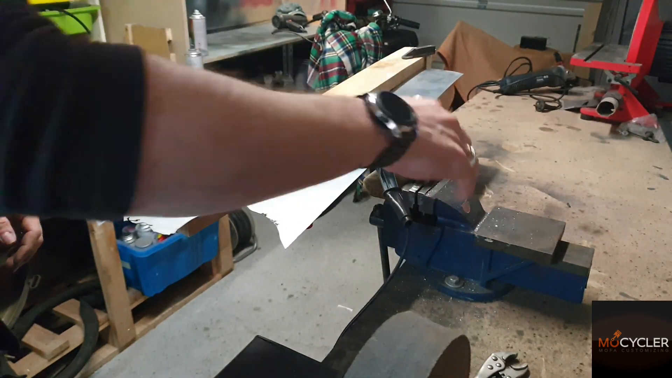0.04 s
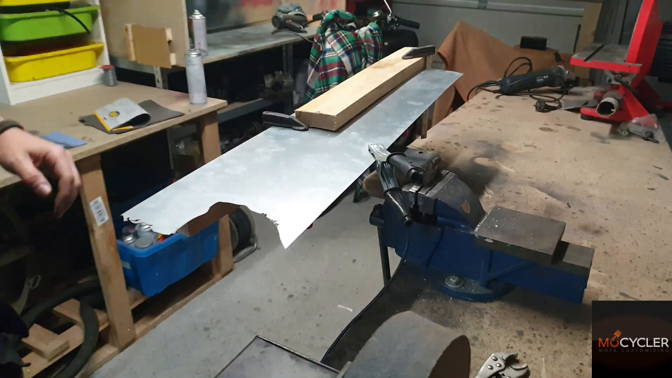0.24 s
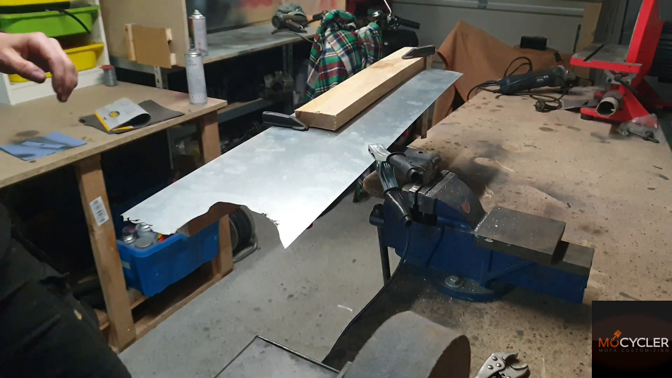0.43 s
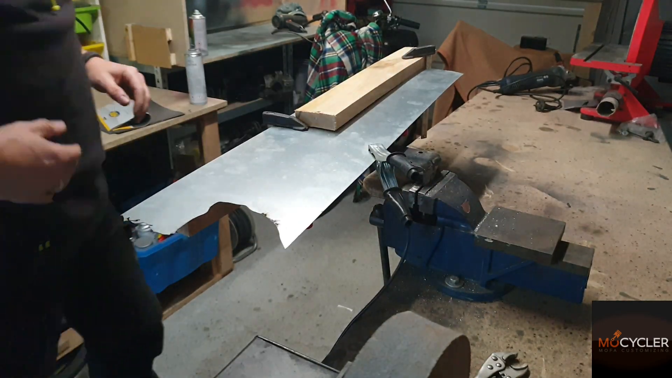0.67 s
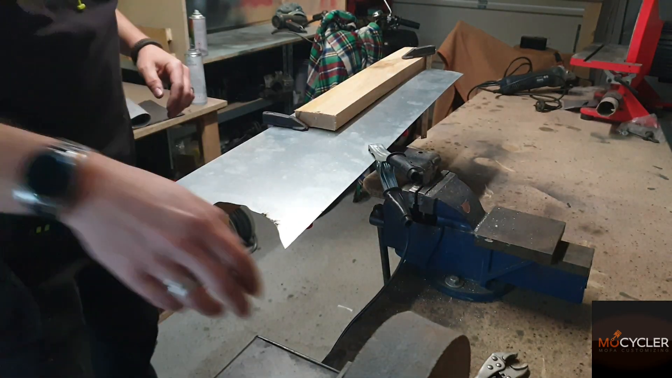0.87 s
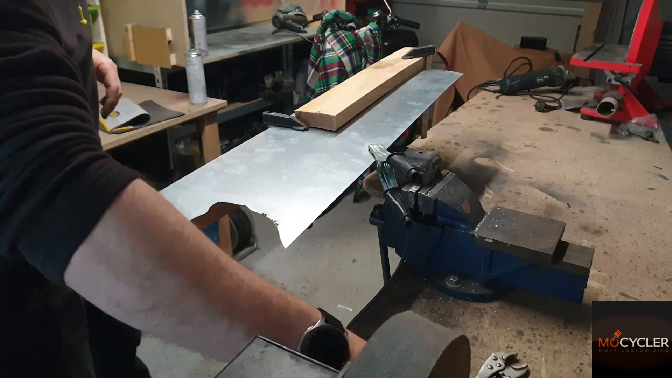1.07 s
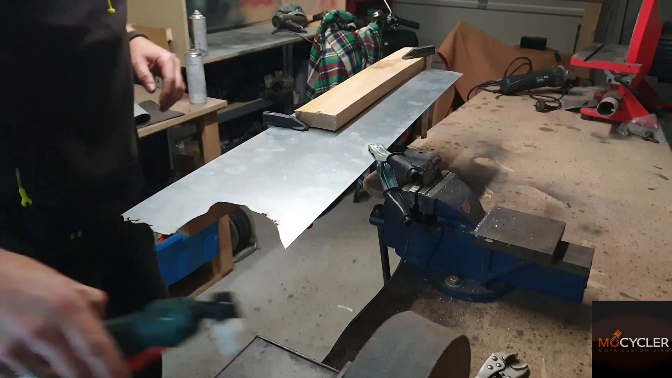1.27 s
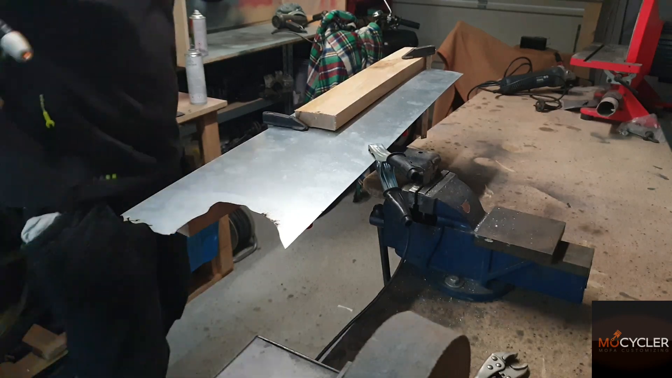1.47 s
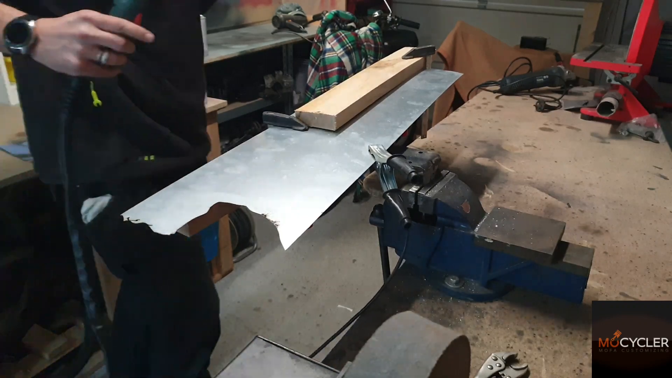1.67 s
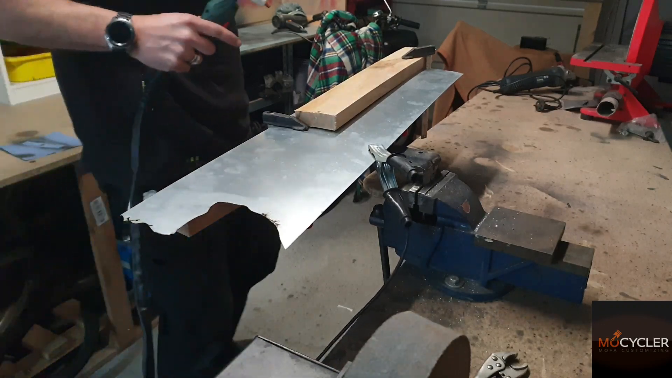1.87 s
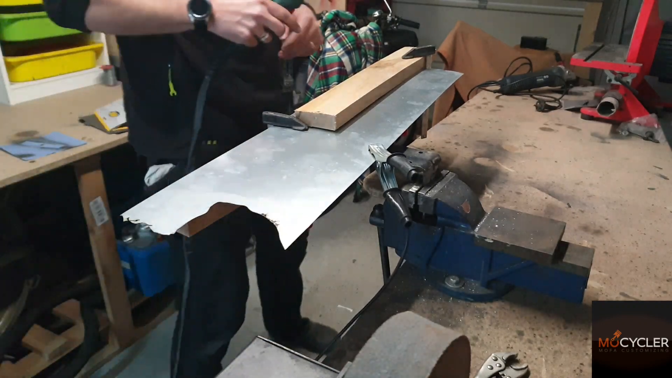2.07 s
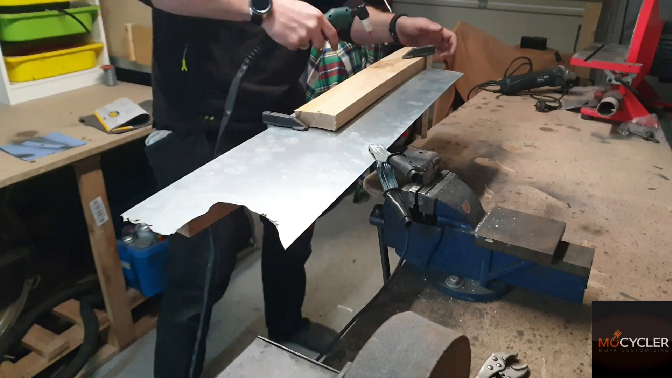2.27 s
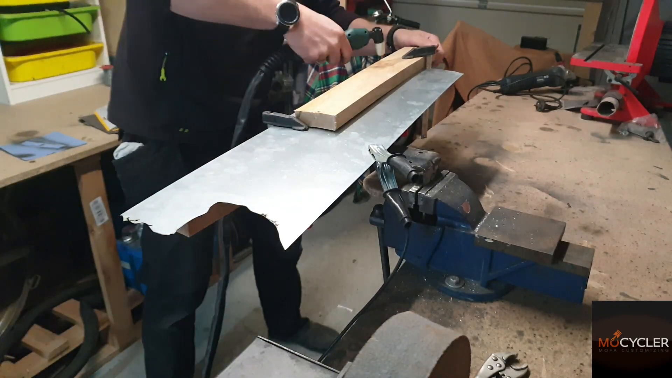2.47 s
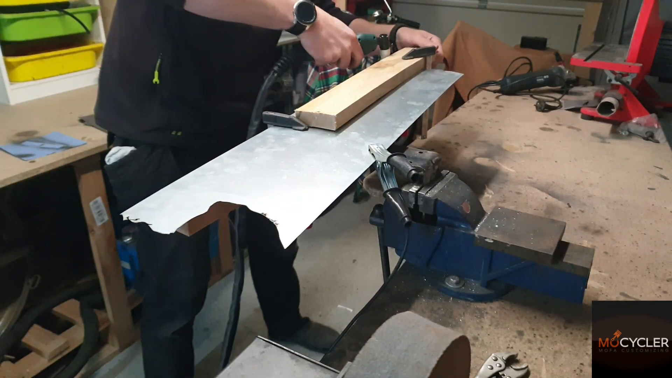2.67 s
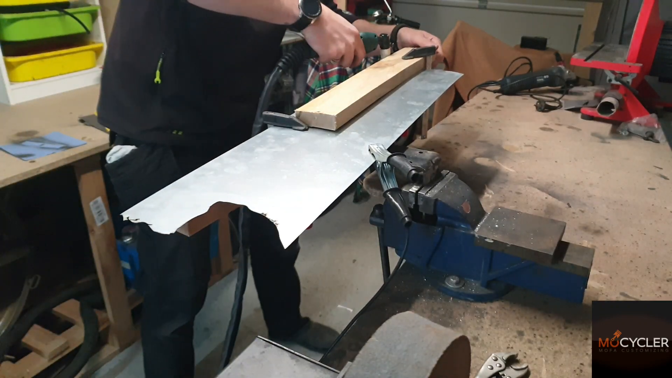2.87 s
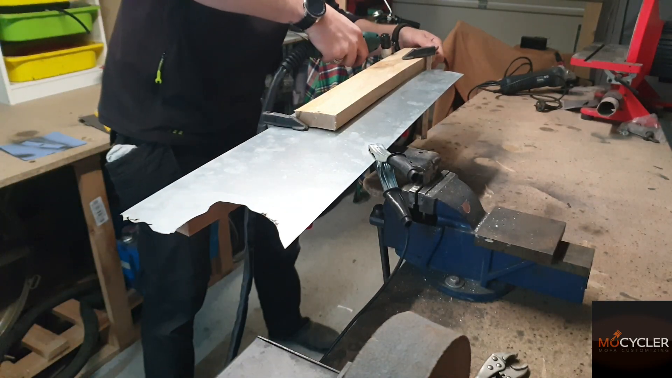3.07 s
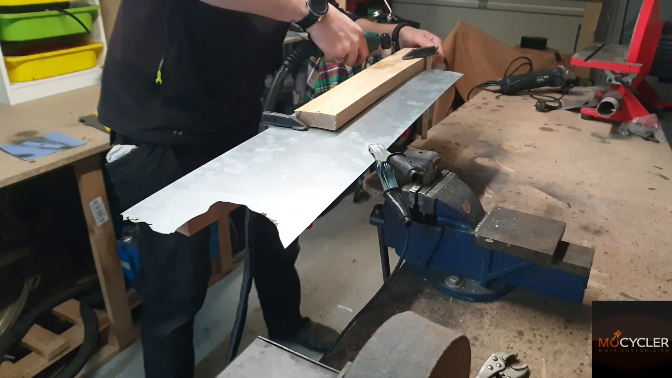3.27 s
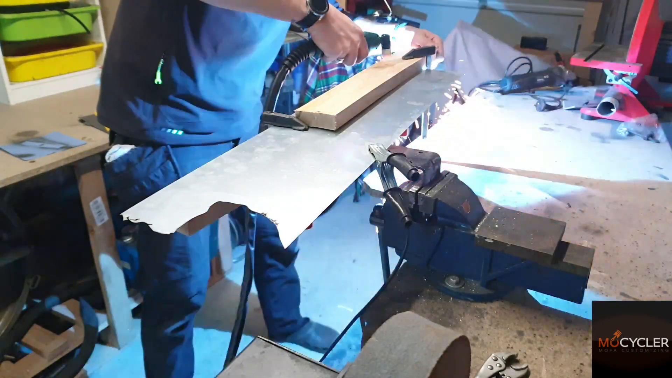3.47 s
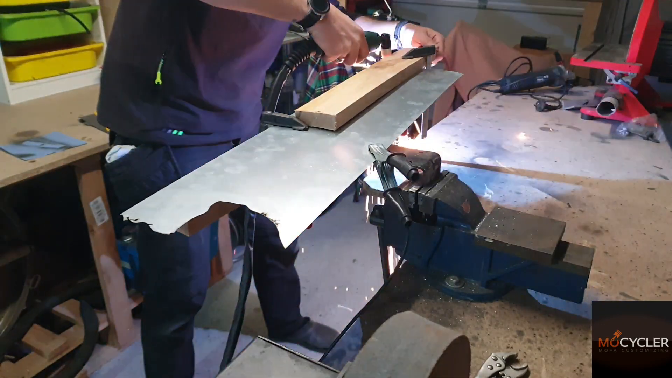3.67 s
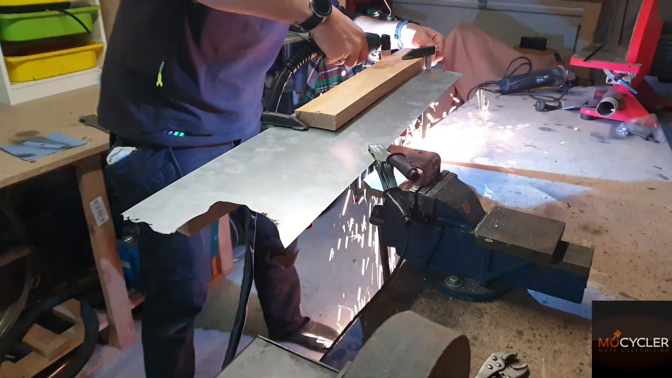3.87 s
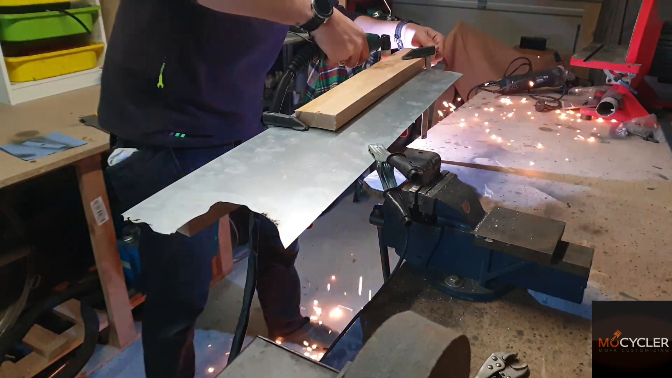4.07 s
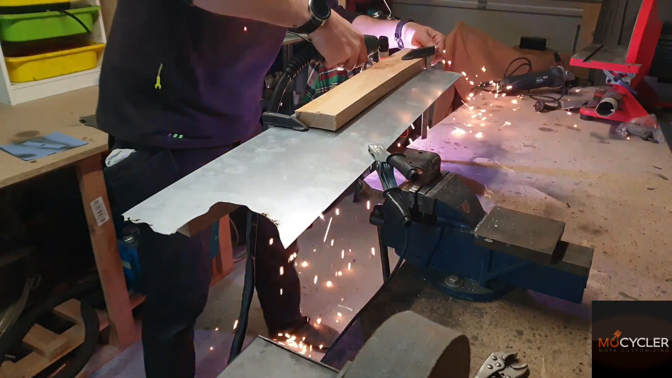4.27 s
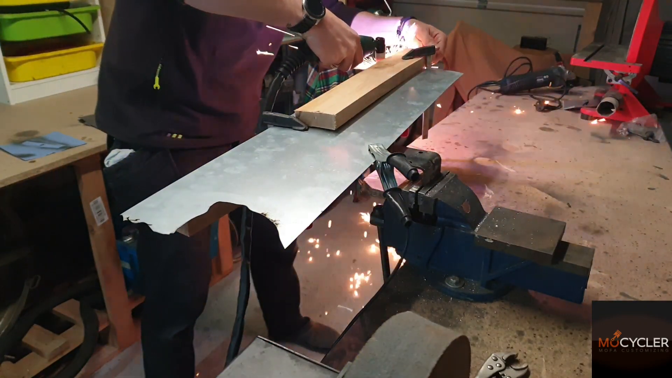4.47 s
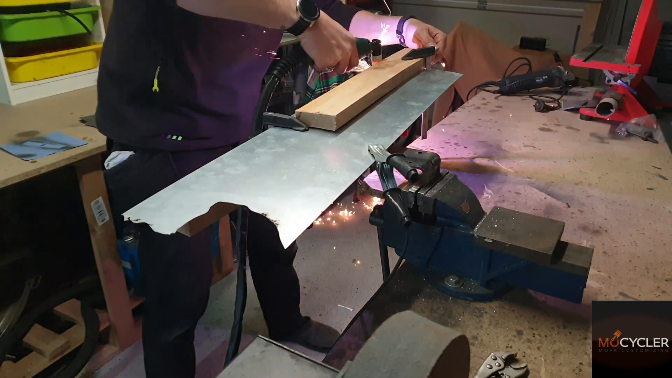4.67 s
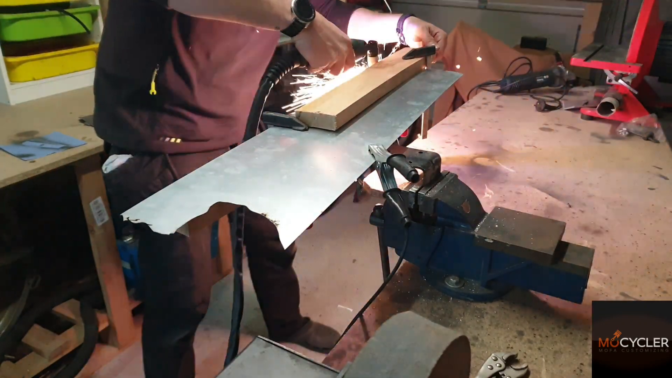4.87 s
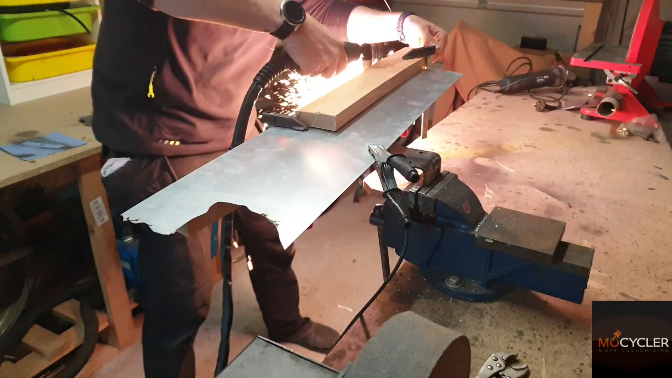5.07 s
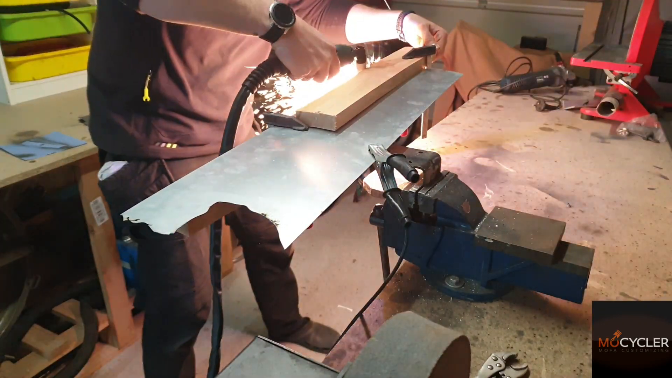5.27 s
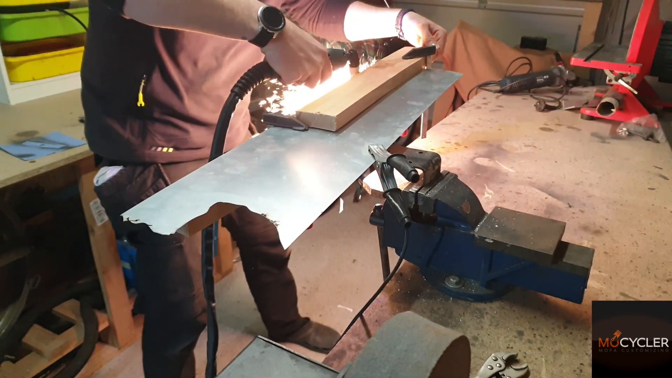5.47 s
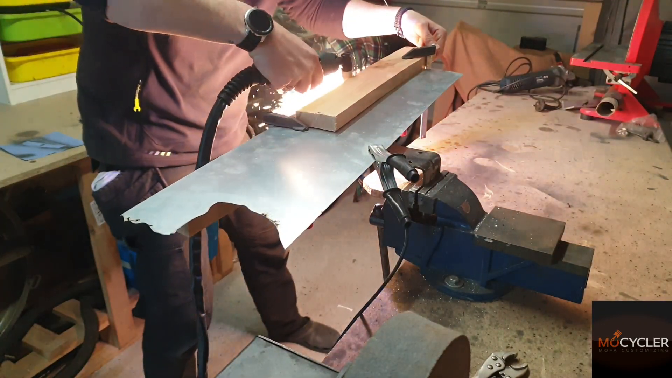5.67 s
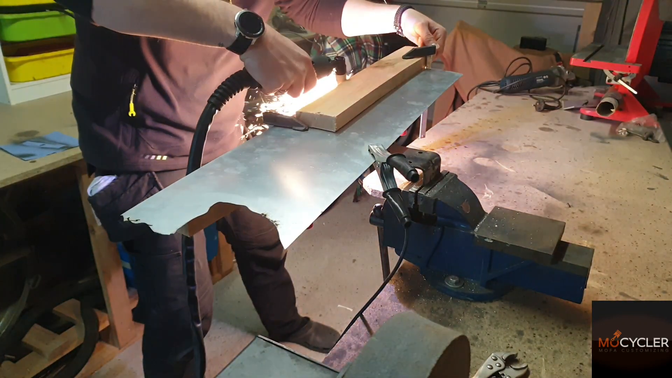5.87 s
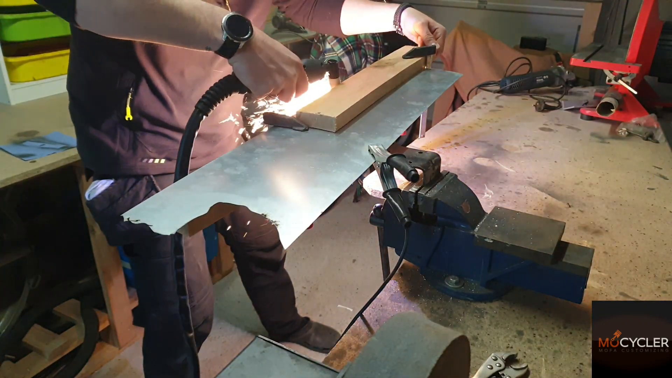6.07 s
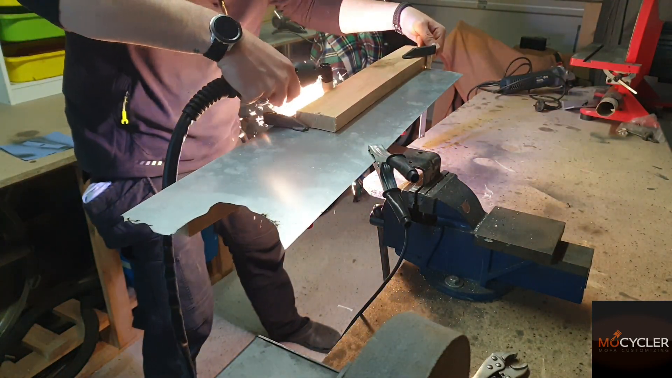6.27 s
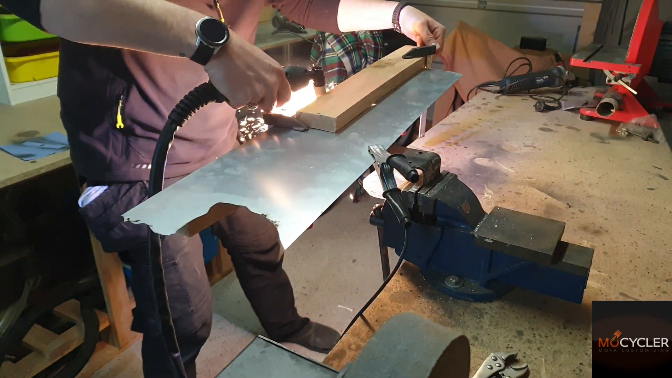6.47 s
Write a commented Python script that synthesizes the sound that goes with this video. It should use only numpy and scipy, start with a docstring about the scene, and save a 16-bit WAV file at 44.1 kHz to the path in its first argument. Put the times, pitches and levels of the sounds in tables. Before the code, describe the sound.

A small workshop with short reverberation, heard by a fixed stereo microphone. From 0 s an idle machine gives a faint midrange whine, low wavering drone and soft air, leaning left. Tiny, scratchy falling chirps come from far off in the first half second and again from 2 to 3.3 s. A slight knock at 0.1 s; at 0.95 to 1.15 s a torch is knocked and scraped off the bench, the clearest handling sound. Dull footfalls follow around 1.0 to 1.7 s, with a small click near 1.8 s and cloth and hose swishes until 2.3 s. At 3.43 s the plasma arc strikes abruptly, very loud against the quiet: low puffs, uneven flares, hollow roar with a blurred whistle. At 4.2 s it enters the sheet; roar and hollowness drop away, leaving a bright, wide, finely crackling hiss, swelling slightly to 5.4 s and continuing steadily to the cutoff at 6.5 s.

```python
"""A plasma cutter in a small workshop: the arc strikes at a steel sheet's edge with a hollow, sputtering
roar, then settles into an even hiss along the cut. Before it, the idle machine hums while someone picks up
the torch and steps to the bench, with faint high chirps in the distance. The jet is shaped turbulent noise
with resonances; knocks and steps are decaying modes; hum and chirps are sines of wavering pitch.
"""
import sys
import numpy as np
from scipy import signal
from scipy.fft import rfft, irfft
from scipy.io import wavfile

SR = 44100
rng = np.random.default_rng(int(sys.argv[2]) if len(sys.argv) > 2 else 0)


def dump(signal):
    """Clip the signal to [-1, 1] and save it as 16-bit WAV at the path in sys.argv[1]."""
    limited = np.clip(np.atleast_2d(signal).T, -1, 1)
    pcm = np.round(limited * 32767).astype(np.int16)
    wavfile.write(sys.argv[1], SR, pcm)


N = 287532
TIME, BINS = np.arange(N) / SR, np.fft.rfftfreq(N, 1 / SR)  # s, Hz
STRIKE_S, ENTER_S = 3.433, 4.21  # the arc lights; the torch leaves the edge and enters the sheet


def torch(flutter_db=0.6, edge_unrest_db=0.3, cut_unrest_db=0.5):
    """Amplitude envelope on jet noise: it starts abruptly with extra level, which decays exponentially."""
    # Level of the air jet as the torch moves. Each row: time in seconds, level in dB without the extra.
    jet_levels = [(4.0, -43.5), (4.28, -39.5), (4.76, -40), (4.97, -37.5), (5.4, -36), (6.5, -37.5)]
    # Low puffs while the arc bites. Each row: centre in seconds, level in dB, width in seconds.
    puff_times = [(3.46, -47.5, 0.06), (3.575, -49.5, 0.086), (3.833, -46.5, 0.038), (4.18, -57, .05)]
    # Spectrum of a puff. Each row: frequency in Hz, relative density in dB per Hz.
    puff_spectrum = [(25, -23), (70, 7), (130, -7), (260, -2), (420, -7.5), (1500, -20)]
    rise_s, extra_db, settle_s = 0.029, 9.5, 0.41
    lit_s = np.maximum(TIME - STRIKE_S, 0)
    level_db = follow(jet_levels) + extra_db * np.exp(-lit_s / settle_s)
    # All parts of the jet flutter together.
    slow_db = cut_unrest_db + (edge_unrest_db - cut_unrest_db) * at_edge()
    unrest_db = flutter_db * wander(140) + slow_db * wander(64)
    jet = ((hiss() + roar() + hollow()) * amp(level_db) + slot()) * amp(unrest_db)
    puffs = noise(amp(read(puff_spectrum))) * swells(puff_times)
    onset = np.minimum(lit_s / rise_s, 1)
    return onset * reflections(jet + puffs, echo_db=-24, drift=0.0001809)


def hiss(fine_db=-1.1, edge_fine_db=-0.03, coarse_db=0.7, edge_coarse_db=-0.5, coarse_flare=0.34,
         spit_db=-12, spits_per_s=200):
    """Turbulence gives broadband noise, molten steel random impulses; small eddies carry the treble."""
    # Jet spectrum. Each row: frequency in Hz, relative density in dB per Hz.
    spectrum = [(300, -49), (900, -14), (1500, -9), (2400, 1), (4000, 2.5), (6000, 0.5), (11000, 3.5),
                (16000, -2.5)]
    dulling_db_per_s = 0.5  # treble lost along the cut
    colour, flare = amp(read(spectrum)), flaring()
    drops = (rng.random(N) < spits_per_s / SR) * rng.uniform(-1.15, 1, (2, N))
    spits = evened(irfft(rfft(drops) * colour, N))
    turbulence = scattered(noise(colour)) + amp(spit_db) * spits
    # The small eddies at the nozzle lie mostly above 6 kHz.
    fine = irfft(rfft(turbulence) / (1 + (6000 / (BINS + 1)) ** 4), N)
    fine_level_db = fine_db + flare + edge_fine_db * at_edge() - dulling_db_per_s * travel()
    coarse_level_db = coarse_db + coarse_flare * flare + edge_coarse_db * at_edge()
    return fine * amp(fine_level_db) + (turbulence - fine) * amp(coarse_level_db)


def roar(level_db=-33.0, edge_db=14.0):
    """Low-frequency jet noise: strong past the edge, weak as the cut begins, then growing."""
    # Spectrum of the roar. Each row: frequency in Hz, relative density in dB per Hz.
    spectrum = [(25, -6), (70, 1), (160, 7), (300, 4.5), (385, -6.5), (480, -8), (620, 3), (850, -3),
                (1400, -5.5), (3000, -33)]
    growth_db_per_s = 4
    return noise(amp(read(spectrum))) * amp(level_db + edge_db * at_edge() + growth_db_per_s * travel())


def hollow(level_db=-17, edge_db=7.0, flare_share=0.47, whistle_db=-19, build_s=0.044, sputter_db=0.8,
           direct=0.32):
    """Flow excites cavity resonances at the sheet's edge and a whistle across it; both take time to build."""
    # Cavity resonances. Each row: frequency in Hz, half-width in Hz, relative level in dB.
    cavity = [(491, 48, -9), (795, 68, -4), (1113, 92, -2), (1220, 38, -3), (1546, 52, -0.5),
              (1872, 83, 4.5), (2170, 83, -5)]
    whistle_hz, waver_hz = 1947, 35.6
    air = noise(resonances(cavity))
    air = evened(air + direct * air[::-1])  # the edge faces the listener: the channels are more alike
    whistle_turns = np.cumsum(whistle_hz + waver_hz * wander(40)) / SR
    whistle = np.sin(2 * np.pi * whistle_turns) * amp(whistle_db + 5 * wander(22))
    build = 1 - np.exp(-np.maximum(TIME - STRIKE_S, 0) / build_s)
    sound = air * amp(level_db + edge_db * at_edge()) + whistle * at_edge()
    return sound * build * amp(flare_share * flaring() + sputter_db * wander(54))


def slot(level_db=-53, growth=1.2):
    """Flow noise through a resonant slot: louder as a power of the time spent cutting."""
    # Broad slot resonances, filling the middle of the hiss.
    # Each row: frequency in Hz, half-width in Hz, relative level in dB.
    slot_peaks = [(1580, 236, -1.5), (2360, 700, -2), (3050, 540, -2)]
    return noise(resonances(slot_peaks)) * amp(level_db) * travel() ** growth


def flaring():
    """Amplitude envelope, in dB, of the arc's flares: each has an attack, a hold and a release."""
    # The arc flares as it bites into the edge.
    # Each row: start in seconds, time until release in seconds, rise in dB (parts of the jet take a share).
    flares = [(3.472, 0.14, 5), (3.614, 0.065, 4), (3.707, 0.083, 6), (3.817, 0.11, 3.5), (4.01, 0.14, 4.5)]
    attack_s, release_s = 0.019, 0.035
    rises = []
    for start, length, db in flares:
        attack = np.clip((TIME - start) / attack_s, 0, 1)
        release = np.exp(-np.maximum(TIME - start - length, 0) / release_s)
        rises.append(db * attack * release)
    return np.max(rises, axis=0)


def at_edge():
    """Smooth transition of the flow: 1 while the jet blows past the sheet's edge, 0 inside the cut."""
    return 0.5 - 0.5 * np.tanh((TIME - ENTER_S) / 0.032)


def travel():
    """Elapsed time of motion: seconds for which the torch has been moving along the cut."""
    return np.maximum(TIME - ENTER_S, 0)


def scattered(x, core_db=-4.5, t60=0.054, count=3):
    """Multipath: the jet's core reaches each port by short paths, which change as the torch moves."""
    t = TIME[:SR // 16]
    paths = rng.standard_normal((count, 2, len(t))) * amp(-60 * t / t60)
    place = np.interp(TIME, [STRIKE_S, TIME[-1]], [0, count - 1])
    core = 0
    for k in range(count):
        share = np.sqrt(np.maximum(1 - abs(place - k), 0))  # equal-power crossfade between clusters
        core = core + share * signal.oaconvolve(x[:1], paths[k], axes=1)[:, :N]
    return evened(x + amp(core_db) * evened(core))


def reflections(x, echo_db, drift, count=8):
    """Comb filtering by echoes off sheet, bench and walls, whose paths shift as the torch moves."""
    out = x.copy()
    for side in range(2):
        delays = rng.uniform(0.001046, 0.018, count)  # s
        speeds = rng.normal(0, drift, count)  # seconds of delay per second
        signs = rng.choice([-1, 1], count)
        for delay, speed, sign in zip(delays, speeds, signs):
            heard_from = TIME - delay - speed * (TIME - STRIKE_S)
            out[side] += sign * amp(echo_db) * np.interp(heard_from, TIME, x[side])
    return out / np.sqrt(1 + count * amp(echo_db) ** 2)


def handling(clack_s=0.013, clatter_db=4):
    """Impacts excite damped modes and friction excites noise: bench knocks, footfalls, cloth and hose."""
    # Knocks on the bench as the torch is taken.
    # Each row: time in seconds, relative ring in dB, relative clack in dB, clack rise in seconds.
    knock_times = [(0.078, -65, -59.5, 0.0022), (0.664, -79, -71, 0.0033), (.947, -37.5, -44, 0.0055),
                   (1.029, -45.5, -61.5, .002), (1.149, -53, -66.5, .003), (1.659, -62.5, -78, 0.0026),
                   (2.667, -66, -68, .003)]
    # Modes of bench, then torch handle, then floor.
    # Each row: frequency in Hz, relative level in dB, 60 dB decay time in seconds.
    bench = [(73.4, -10.5, 0.34), (164.4, 9.5, 0.11), (198, -6, 0.14), (272, -2.5, 0.14), (627, -29, 0.11),
             (900, -28, 0.048), (1524, -14, 0.02), (2030, -38, 0.091)]
    handle = [(1003, 0, 0.022), (1500, 4, 0.018), (2450, -4, 0.05), (2740, 5, 0.024), (3050, -2, 0.042),
              (3700, -9, .03), (4360, -10, .03), (5160, -9, .02)]
    floor = [(52.3, -2.5, 0.34), (83, -1.5, 0.22), (94.2, 9, 0.12), (135, -7, 0.14)]
    # Spectra of clack and clothing. Each row: frequency in Hz, relative density in dB per Hz.
    clack_spectrum = [(100, 13), (500, -13), (1500, -10), (2500, -7.5), (5500, -12.5), (9000, -23.5),
                      (15000, -29)]
    cloth_spectrum = [(200, 1), (1400, -2.5), (3000, -4), (6500, -12.5), (11000, -15.5), (15000, -32)]
    # Resonances of the torch as it scrapes off the bench.
    # Each row: frequency in Hz, half-width in Hz, relative level in dB.
    clatter = [(535, 210, 10), (674, 61, 1), (810, 60, 13), (1220, 230, 4), (1440, 140, 3.5), (1800, 53, 4),
               (2180, 87, 4), (3020, 140, -6.5), (4120, 99, -12), (4730, 330, -14)]
    # Clicks of the handle in the hand, then footfalls. Each row: time in seconds, relative level in dB.
    click_times = [(1.761, -61.5)]
    step_times = [(.214, -57), (1.04, -48), (1.44, -44), (1.49, -59), (1.555, -56), (1.69, -63),
                  (2.88, -57)]
    # Swishes of clothing and hose. Each row: centre in seconds, relative level in dB, width in seconds.
    swishes = [(.32, -79.5, 0.24), (.7, -84.5, 0.2), (1.11, -76.5, 0.18), (1.39, -78, 0.028),
               (1.53, -77.5, 0.21), (1.645, -77, 0.048), (1.7, -73, 0.077), (1.82, -76, 0.13),
               (2.22, -71.5, 0.041), (2.33, -70.5, 0.06)]
    contact = np.zeros(N)
    for s, _, db, rise in knock_times:
        contact += amp(db) * np.exp(-np.maximum((s - TIME) / rise, (TIME - s) / clack_s))
    scrape = noise(amp(read(clack_spectrum)) + amp(clatter_db) * resonances(clatter)) * contact
    knocks = scrape + blows(knock_times, bench, soft_s=0.0084)
    click = blows(click_times, handle, soft_s=0.00063)
    steps = blows(step_times, floor, soft_s=0.013)
    cloth = noise(amp(read(cloth_spectrum))) * swells(swishes) * amp(2 * wander(90))
    return room((knocks + click + steps + cloth) * pan(3.3), wet_db=-10.5)


def machine(whine_db=-4, drone_db=-76, air_db=-69):
    """Rotation gives harmonic tones and flow gives noise: a fan's whine, a wavering drone, rushing air."""
    # Whine of the idle machine. Each row: time in seconds, frequency in Hz, relative level in dB.
    whine_curve = [(0.0, 456, -63), (1.24, 457.3, -61.5), (1.9, 459, -60.5), (3.4, 456, -60)]
    # Its harmonics. Each row: multiple of the frequency, relative level in dB.
    overtones = [(1, 0.5), (2, -25), (3, -30)]
    # Faint wavering tones. Each row: mean frequency in Hz, relative level in dB.
    hum_tones = [(1104, -96.5), (1443, -91.5), (1561, -93), (1830, -94.5)]
    # Spectrum of the air. Each row: frequency in Hz, relative density in dB per Hz.
    fan_spectrum = [(25, -11), (60, 1.5), (100, 9.5), (140, -12.5), (200, -13.5), (300, -9), (520, -6),
                    (800, -13.5), (1050, -12), (1300, -17), (1520, -17.5), (2100, -22.5), (6500, -33),
                    (9000, -45), (15500, -41)]
    drone_hz = 96
    heard_db, fade_s = -14, 0.33  # from the strike on, this background is heard fainter
    turns = np.cumsum(follow(whine_curve) * (1 + 0.0015 * wander(7))) / SR
    waver_db = 0.7 * wander(9)
    whine = sum(amp(db) * np.sin(2 * np.pi * k * turns) for k, db in overtones)
    whine = whine * amp(follow(whine_curve, axis=2) + whine_db + waver_db)
    drone_turns = np.cumsum(drone_hz + 6 * wander(12.34)) / SR
    drone = np.sqrt(2) * np.sin(2 * np.pi * drone_turns) * amp(drone_db + 2.8 * wander(7.8))
    air = amp(air_db) * noise(amp(read(fan_spectrum)))
    hum = sum(amp(db) * np.sin(2 * np.pi * np.cumsum(hz + 4 * wander(6.4)) / SR) for hz, db in hum_tones)
    background_gain = amp(heard_db * np.clip((TIME - STRIKE_S) / fade_s, 0, 1))
    return (whine * pan(7.6) + drone * pan(12.0) + (air + hum) * pan(5.1)) * background_gain


def chirps(length_s=0.03, fall_per_s=1.8, spread=0.12):
    """Frequency modulation: falling two-note chirps, scratchy from fast random pitch, blurred by the room."""
    # Each row: centre of the first note in seconds, relative level in dB, mid-note pitch in Hz.
    calls = [(.07, -89, 4650), (.24, -84, 4020), (.53, -79.5, 4760), (2.017, -78.5, 3850),
             (2.614, -81, 3940), (2.76, -87, 4400), (2.89, -90, 5440), (3.085, -80, 4450),
             (3.25, -88, 3650)]
    gap_s, ratio = 0.028, 0.81  # the second note is later and lower
    out, waver = np.zeros(N), 1 + spread * wander(900)
    for start, db, first_hz in calls:
        for s, hz in (start, first_hz), (start + gap_s, first_hz * ratio):
            pitch = hz * waver * (1 - np.clip(fall_per_s * (TIME - s), -0.5, 0.5))
            out += swells([(s, db, length_s)]) * np.sin(2 * np.pi * np.cumsum(pitch) / SR)
    return room(out * pan(12.0) * amp(1.8 * wander(120)), wet_db=-12.5)


def room(x, wet_db):
    """Reverberation: the workshop's dense reflections form an exponentially decaying noise tail."""
    t = TIME[:SR // 2]
    t60 = 0.13  # s
    tail = rng.standard_normal((2, len(t))) * amp(-60 * t / t60) * (t > 0.004)
    tail /= np.linalg.norm(tail, axis=1, keepdims=True)
    return x + amp(wet_db) * signal.oaconvolve(x, tail, axes=1)[:, :N]


def blows(rows, body, soft_s):
    """Linear superposition: soft blows at rows (s, dB, ..) convolved with a body's modal response."""
    hits = np.zeros(N)
    for s, db, *_ in rows:
        hits[round(s * SR)] += amp(db)
    softness = 1 - np.exp(-TIME[:SR // 2] / soft_s)
    return signal.oaconvolve(hits, ring(body) * softness)[:N]


def ring(modes):
    """Modal synthesis: a struck body is a sum of exponentially decaying sines."""
    t = TIME[:SR // 2]
    return sum(amp(db - 60 * t / t60) * np.sin(2 * np.pi * hz * t) for hz, db, t60 in modes)


def resonances(peaks):
    """Resonance curves summed in power: gain from rows (Hz, half-width Hz at -6 dB, dB)."""
    return np.sqrt(sum(amp(db) ** 2 / (1 + ((BINS - hz) / width) ** 2) ** 2 for hz, width, db in peaks))


def noise(gain):
    """Filtered stereo noise of rms 1, whose coherence between channels depends on frequency."""
    # Each row: frequency in Hz, left-right correlation from -1 to 1.
    likeness = [(60, 1), (130, 1), (290, 1), (640, 0.052), (1410, -0.28), (3100, 0.23), (6820, -0.031),
                (15000, 0.11)]
    a, b = rfft(rng.standard_normal((2, N)))
    same = np.clip(read(likeness), -1, 1)
    return evened(irfft(np.array([a, same * a + np.sqrt(1 - same ** 2) * b]) * gain, N))


def wander(rate_hz):
    """Low-pass filtered chance: a random fluctuation of rms 1."""
    return evened(irfft(rfft(rng.standard_normal(N)) / (1 + (BINS / rate_hz) ** 2), N))


def swells(rows):
    """Gaussian envelopes from rows (centre s, dB, full width s at 1/e of the peak)."""
    return sum(amp(db) * np.exp(-(2 * (TIME - s) / length) ** 2) for s, db, length in rows)


def read(points, hz=BINS, axis=1):
    """Interpolation of a spectrum column on a log-frequency axis."""
    table = np.transpose(points)
    return np.interp(np.log(hz + 1), np.log(table[0] + 1), table[axis])


def follow(rows, axis=1):
    """Linear interpolation of a time curve's column at every sample."""
    table = np.transpose(rows)
    return np.interp(TIME, table[0], table[axis])


def pan(left_db):
    """Interchannel level difference: gains that make left exceed right by left_db."""
    return amp([[left_db / 2], [-left_db / 2]])


def amp(db):
    """Logarithmic level to linear gain: 20 dB is a factor of ten in amplitude."""
    return 10 ** (np.asarray(db) / 20)


def evened(x):
    """Normalisation of mean power: scales to rms 1."""
    return x / np.sqrt(np.mean(x ** 2) + 1e-20)


def scene():
    """Superposition: the sound pressures of all sources add at the listener."""
    return torch() + machine() + handling() + chirps()


def record(dry):
    """Linear filtering: each microphone port colours its channel, then a low-pass limits the band."""
    # Each row: frequency in Hz, left gain in dB, right gain in dB.
    port_colour = [(220, -1.5, 0), (440, 5, -2), (1500, 5, 2.5), (2240, 5, -2.5), (4010, 4, 2.5),
                   (5660, 5.5, 4), (7030, 10.5, 2.5), (8100, 4, -30), (8850, 5, -17), (9400, 5, -3.5),
                   (11800, 9.5, -2.5), (12000, 3, 1), (15600, 7.5, 7)]
    cut_hz = 15800
    ports = amp([read(port_colour), read(port_colour, axis=2)])
    impulse = np.fft.fftshift(irfft(ports, N), axes=1)
    taps = impulse[:, N // 2 - 256:N // 2 + 257] * np.hanning(513)
    coloured = signal.oaconvolve(dry, taps, "same", axes=1)
    low_pass = signal.firwin(1023, cut_hz, window=("kaiser", 9), fs=SR)
    return signal.oaconvolve(coloured, low_pass[None], "same", axes=1)


dry = scene()
out = record(dry)
dump(out)
```